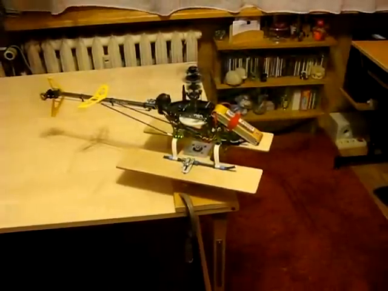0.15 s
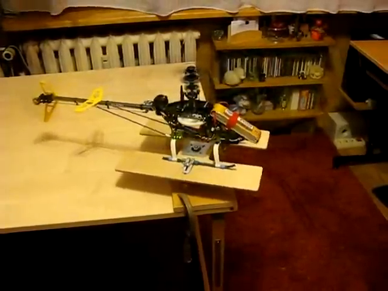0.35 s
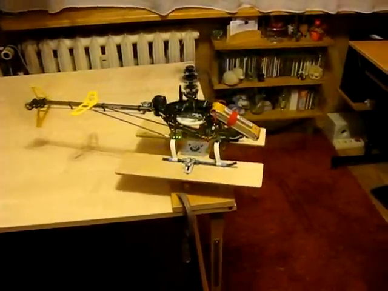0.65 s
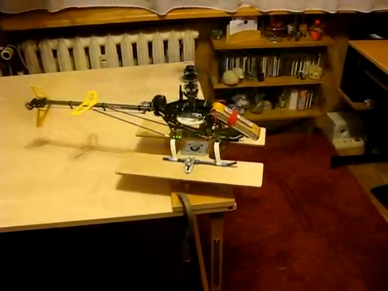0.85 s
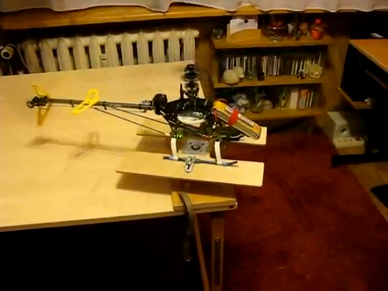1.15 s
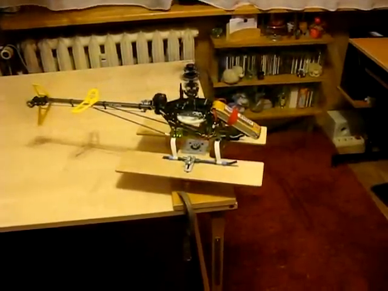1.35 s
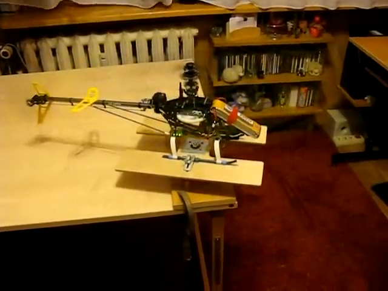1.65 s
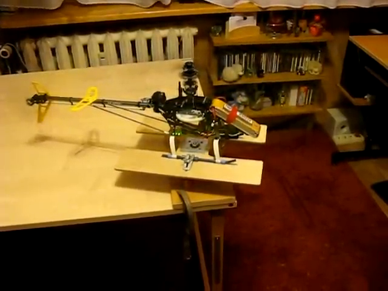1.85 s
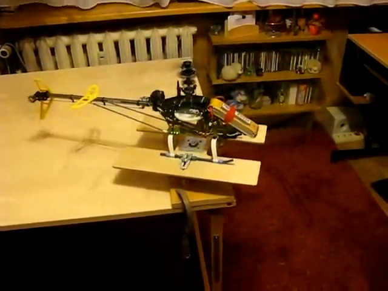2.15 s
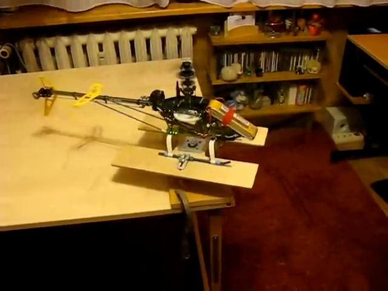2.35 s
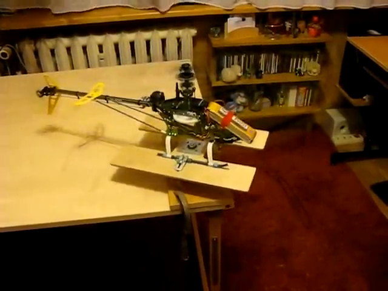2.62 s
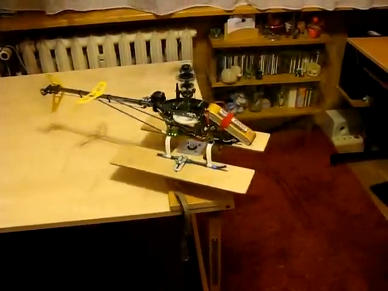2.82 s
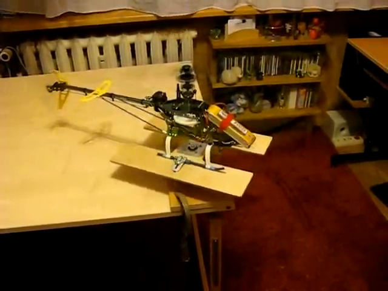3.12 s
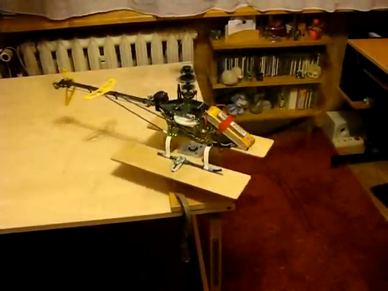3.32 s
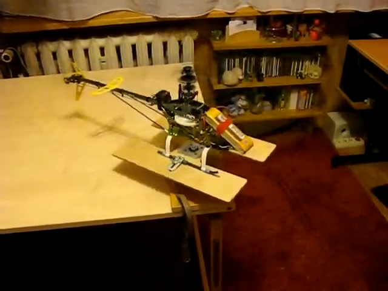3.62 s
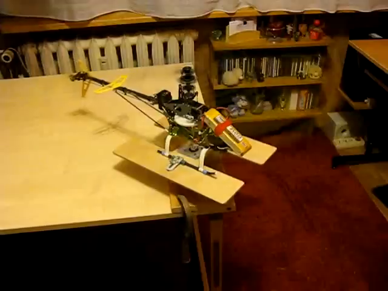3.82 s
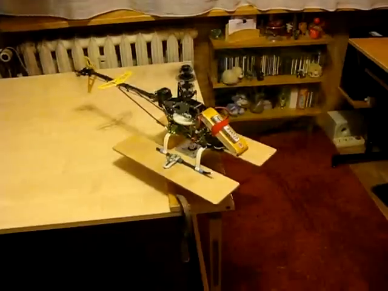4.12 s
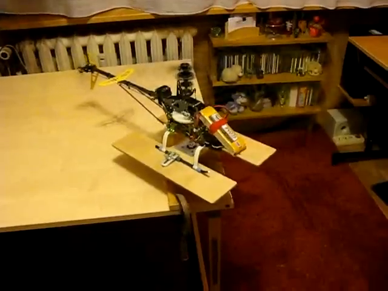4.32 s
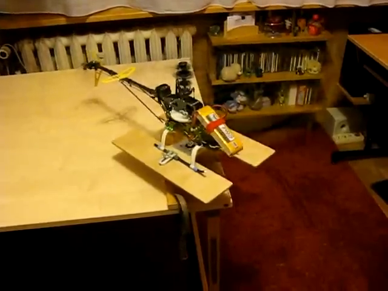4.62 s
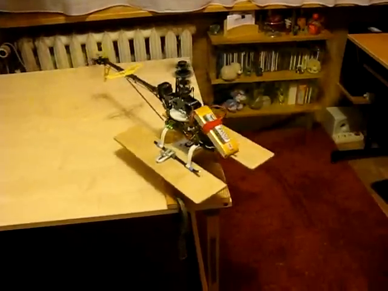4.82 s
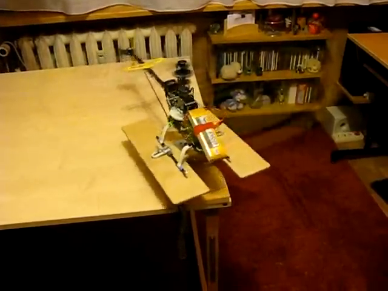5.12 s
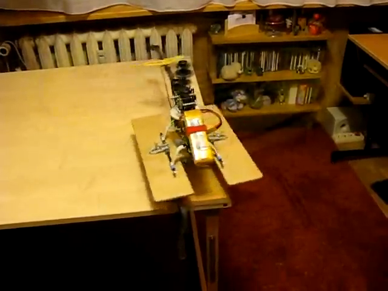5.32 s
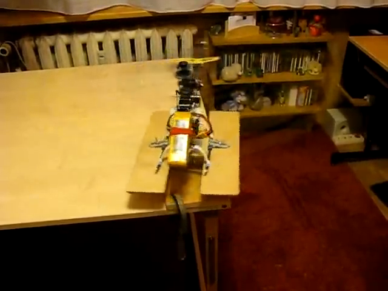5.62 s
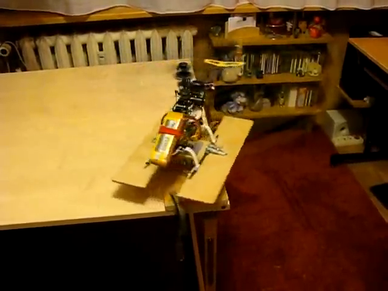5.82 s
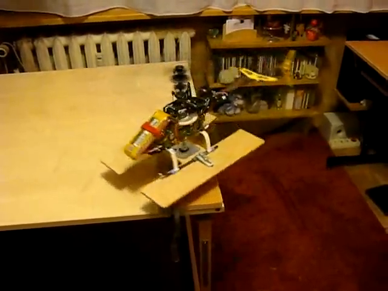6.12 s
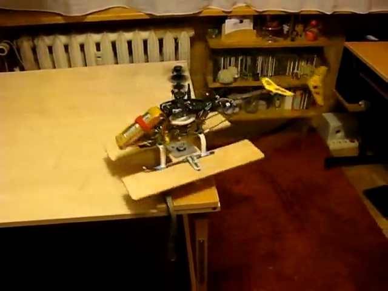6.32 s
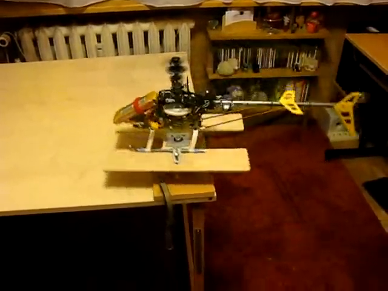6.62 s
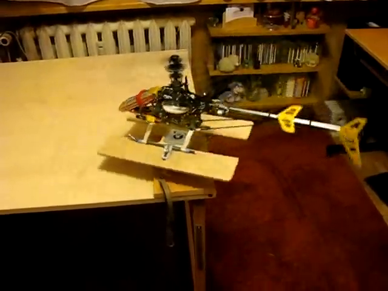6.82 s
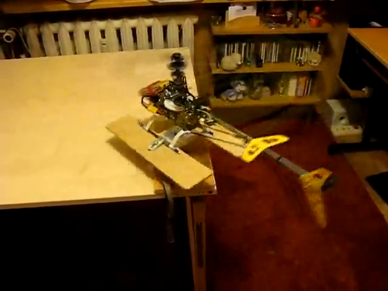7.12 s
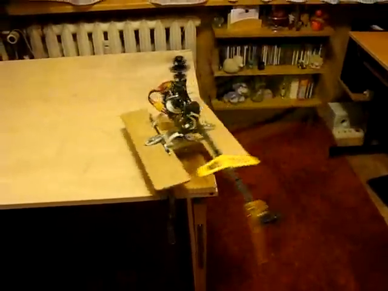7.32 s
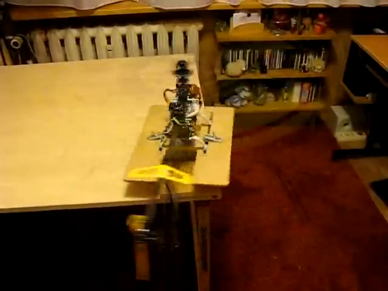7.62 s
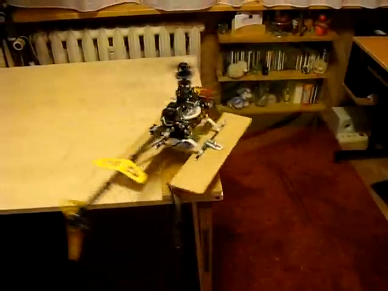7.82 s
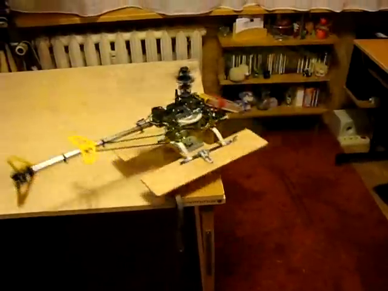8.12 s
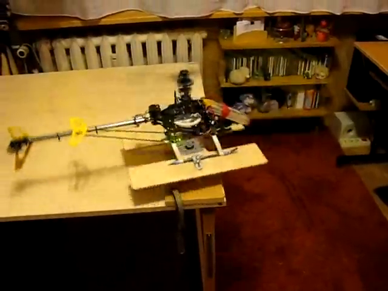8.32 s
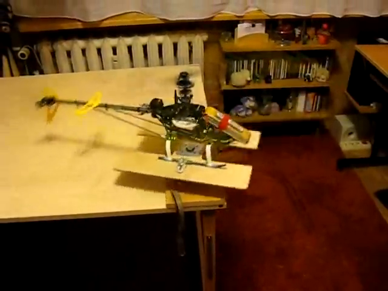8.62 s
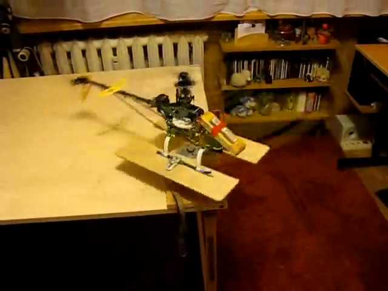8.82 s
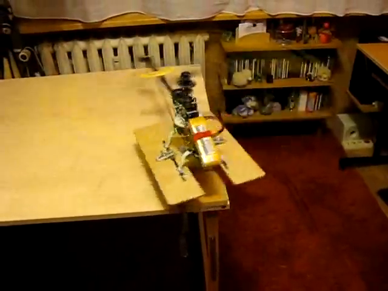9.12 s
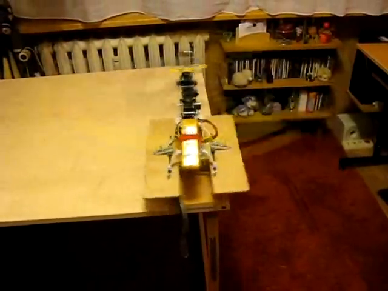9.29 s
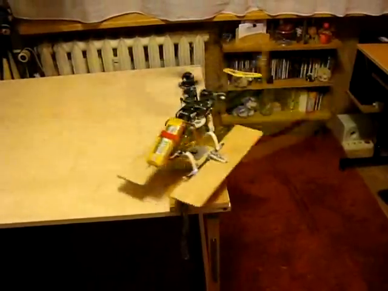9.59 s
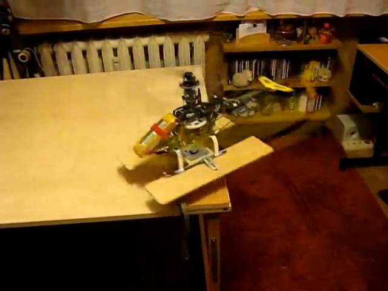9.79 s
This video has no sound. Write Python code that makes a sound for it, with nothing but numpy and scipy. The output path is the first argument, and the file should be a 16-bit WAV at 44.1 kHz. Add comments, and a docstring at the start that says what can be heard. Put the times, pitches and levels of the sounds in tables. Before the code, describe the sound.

In a furnished room, close to the microphone, a small electric model helicopter whines steadily with bright gear rasp, rising slightly for two seconds. The throttle closes: pitch slides down through a chirping, fluttering squeal and a thin electronic whistle. As the model swings round on its stand, small rattles shiver, then crisp metallic ticks cluster near the tail. It ends as a quiet, dry, slowing whirr over soft low bumps.

```python
"""Electric model helicopter running down

Without main blades, it runs on a swivelling stand in a furnished room. After two seconds the throttle closes.
Gear whine, whirrs and rasp follow one gear phase that slows down, with frame hum and a chirping squeal.
Rattles as the model swings round and tail-rotor ticks come at set times; a switching whistle is a sine.
Soft low bumps are filtered random pulses over filtered noise."""
import sys
import numpy as np
from scipy import signal
from scipy.fft import rfft, irfft, next_fast_len
from scipy.io import wavfile

SR = 44100
rng = np.random.default_rng(int(sys.argv[2]) if len(sys.argv) > 2 else 0)


def store_wav(level_fs):
    """Save 16-bit WAV to argv[1]."""
    pcm = np.round(np.clip(np.atleast_2d(level_fs), -1, 1) * 32767)
    wavfile.write(sys.argv[1], SR, pcm.T.astype(np.int16))


N = 438794
TIME = np.arange(N) / SR
SIZE = next_fast_len(N)
FREQS = np.maximum(np.fft.rfftfreq(SIZE, 1 / SR), 1)
GEAR_TEETH, PINION_TEETH, TAIL_RATIO = 150, 13, 4.24

# Level of the soft low bumps before wander. Each row: time in seconds, level in dB.
BUMP_LEVEL = [(0, -52), (2.7, -53.5), (4.45, -49.5), (6.4, -51.5), (9.95, -50)]
# Spectrum of the bumps. Each row: frequency in Hz, relative gain in dB.
BUMP_COLOUR = [(15, -11), (50, -1.5), (130, -1.5), (250, -4), (450, -8.5), (900, -17.5), (3000, -34)]
# Whistle of the speed controller. Each row: time in seconds, level in dB of the steady tone.
SWITCHING_LEVEL = [(0, -58), (.6, -44), (2.1, -38), (2.6, -52), (3.5, -38), (4.2, -35), (4.6, -50),
                   (4.9, -92)]
# Ticks at the tail. Each row: start in seconds, relative strength in dB.
TAIL_TICKS = [(7.7842, -38), (7.8092, -32), (7.8261, -37), (7.9329, -31), (8.0197, -35), (8.0531, -30),
              (8.0765, -29), (8.1429, -28), (8.1524, -33), (8.2107, -39), (8.2342, -24), (8.2571, -33),
              (8.2811, -30), (8.328, -39), (8.3514, -33), (8.3754, -33), (8.5455, -36)]
# Ringing modes of the ticking part. Each row: frequency in Hz, relative level in dB, t60 in seconds.
TICK_MODES = [(10850, -15, .012), (11000, -7, .016), (11000, -11, 0.0087), (11800, -9, .004),
              (10600, -12, .005), (13100, -27, .004)]
# Rattles of the swinging frame. Each row: start in seconds, relative strength in dB.
FRAME_RATTLES = [(5.99, -31.5), (6.075, -38), (6.165, -32.5), (6.239, -33), (6.405, -37), (6.5, -38),
                 (6.73, -39), (7.11, -37.5), (7.765, -45), (8.08, -37.5), (8.24, -43), (8.435, -40),
                 (8.865, -46), (8.895, -42), (9.23, -52), (9.39, -53)]
# Resonances of frame and stand. Each row: frequency in Hz, width in Hz, relative gain in dB.
FRAME_MODES = [(62.6, 18, -5), (123, 50, -12), (234, 64, -3), (528, 19, 5), (782, 27, 5), (885, 37, 0),
               (1069, 60, 2.5), (1320, 190, -1)]
# Tooth rate of the main gear. Each row: time in seconds, rate in Hz.
TOOTH_RATE = [(0, 4305), (.25, 4295), (.6, 4435), (1, 4585), (1.5, 4675), (1.85, 4716), (2.05, 4705),
              (2.3, 4605), (2.6, 4440), (3.3, 3990), (3.55, 3800), (4.7, 3280), (5, 3020), (6, 1960),
              (6.75, 1330), (7.1, 1080), (7.7, 860), (9, 640), (9.95, 530)]
# Rasp of teeth, belt and bearings. Each row: time in seconds, then relative level in dB for each rasp band.
RASP_LEVEL = [(0.0, -43.5, -42, -27.5, -24), (0.14, -47, -44, -30, -25), (0.3, -42, -39, -28.0, -26.5),
              (0.75, -45, -41, -33, -28), (2.05, -45.5, -41.5, -34, -28.0), (2.65, -50, -46, -32.5, -23),
              (2.9, -49.0, -45, -33, -24), (3.1, -44, -43.5, -29.5, -25.5), (3.7, -47, -41, -30, -29),
              (4.4, -48.5, -41.5, -30.5, -33.5), (5.1, -50, -42.5, -33.5, -35.5),
              (5.8, -52.5, -44.5, -40, -42.5), (6.3, -53, -45, -44, -45.5), (6.9, -53, -48, -47.5, -49.5),
              (7.65, -53.5, -52.5, -52.5, -52), (9.0, -54.5, -59.5, -54.5, -54.5),
              (9.95, -53.5, -61, -55.5, -55.5)]
# Bands of the rasp levels. Each row: lower edge in Hz, upper edge in Hz.
RASP_BANDS = [(600, 1800), (2200, 3300), (5300, 8400), (9900, 13000)]
# Rasp spectrum with teeth pressed together. Each row: frequency in Hz, relative gain in dB.
TIGHT_COLOUR = [(100, -21), (400, -7), (800, -1.5), (1700, -2), (2700, -1), (3700, 2), (5300, 2.5),
                (7200, -1.5), (9000, 0), (10800, 0.5), (12000, -1), (13000, -3.5), (13800, -7)]
# Rasp spectrum with teeth running loose. Each row: frequency in Hz, relative gain in dB.
LOOSE_COLOUR = [(100, 1.5), (500, 1.5), (800, 1.5), (1030, 1), (1500, -1), (3000, 1), (3620, 3),
                (3870, 5.5), (4150, 1.5), (5300, 3), (6200, 1), (7000, 3), (7900, -4.5), (9100, 1),
                (10000, -2), (10700, 1.5), (12200, -2.5), (13800, -8.5)]
# Once-a-turn throb of the rasp. Each row: time in seconds, depth from 0 to 1 at the top of the treble.
RASP_THROB = [(0, 0.15), (.6, .1), (1.4, 0.28), (2.1, 0.25), (3.4, 0.02)]
# Whine away from resonances. Each row: time in seconds, then relative level in dB of the tooth rate,
# of its 2nd multiple and of its 3rd.
WHINE_LEVEL = [(0, -32.5, -41, -47), (.55, -27, -27, -30), (1, -24, -28, -35), (1.5, -25, -27, -27),
               (2, -24, -28.5, -40), (2.8, -32, -39, -46), (3.3, -39.5, -48, -46), (3.9, -37.5, -41, -33.5),
               (5, -50, -42, -45), (5.7, -64, -51.5, -63), (6.15, -59, -51, -49), (7, -72, -69, -58),
               (9.95, -80, -91, -73)]
# Resonances that lift a passing multiple of the tooth rate.
# Each row: frequency in Hz, half width (Gaussian sigma) in Hz, lift in dB.
WHINE_FLARES = [(1073, 25, 15), (1320, 35, 16), (1930, 55, 6.5), (3780, 87, 2), (5120, 160, 10),
                (5680, 150, 7)]
# Higher whirrs of the drive. Each row: multiple of the tooth rate, centre in seconds,
# half length (Gaussian sigma) in seconds, relative level in dB, width in Hz.
DRIVE_WHIRRS = [(1.073, 1.3, 0.96, -37.5, 45), (1.4, 4.1, .5, -56, 45), (2.48, 3.17, 0.59, -34, 380),
                (2.556, .1, .15, -35, 200), (2.917, 2.1, 0.7, -37, 260), (1.931, 1.6, 0.69, -38.5, 150),
                (3.013, 4.3, 0.41, -38.5, 262), (3.973, 4.47, 0.25, -37, 300)]


def from_db(db):
    """Decibels to gain."""
    return 10 ** (np.asarray(db) / 20)


def rms_one(x):
    """Scale to unit rms."""
    return x / np.sqrt(np.mean(np.abs(x) ** 2) + 1e-20)


def in_time(rows):
    """Interpolate each column of a time table at every sample."""
    s, *columns = np.transpose(rows)
    return [np.interp(TIME, s, column) for column in columns]


def colour(points):
    """Gain at every frequency from (Hz, dB) points, interpolated on log frequency."""
    hz, db = np.transpose(points)
    return from_db(np.interp(np.log(FREQS), np.log(hz), db))


def shaped(x, gain):
    """Filter by a gain per frequency."""
    return irfft(rfft(x, SIZE) * gain, SIZE)[:N]


def drift(bandwidth_hz):
    """Low-passed noise of rms 1."""
    return rms_one(shaped(rng.standard_normal(N), 1 / (1 + (FREQS / bandwidth_hz) ** 4)))


def swell(centre_s, sigma_s):
    """Gaussian rise and fall of height 1."""
    return np.exp(-((TIME - centre_s) / sigma_s) ** 2 / 2)


def ring(clicks, hz, t60_s):
    """Two-pole resonator: a unit click starts a decaying sine of about height 1."""
    radius = from_db(-60 / (t60_s * SR))
    w = 2 * np.pi * hz / SR
    return signal.lfilter([0, np.sin(w)], [1, -2 * radius * np.cos(w), radius ** 2], clicks + 1e-18)


def blurred(phase, width_hz):
    """Tone of about rms 1, smeared into a narrow band by random quadrature amplitudes."""
    return drift(width_hz) * np.cos(phase) + drift(width_hz) * np.sin(phase)


def room(x, wet_db, t60_s=0.41):
    """Add a short diffuse tail from walls and shelves: decaying noise after 4 ms."""
    age_s = TIME[:SR // 2]
    tail = rng.standard_normal(len(age_s)) * from_db(-60 * age_s / t60_s) * (age_s > .004)
    return x + from_db(wet_db) * signal.fftconvolve(x, tail / np.linalg.norm(tail))[:N]


def bumps(pulses_per_s=60, size_spread_db=1.0, patter_db=-1, rumble_db=-7, wander_db=1.8, wander_hz=8.9):
    """Dull one-sided pulses at random times over a soft rumble; a wandering level clusters them."""
    pulses = (rng.random(N) < pulses_per_s / SR) * from_db(size_spread_db * rng.standard_normal(N))
    gain = colour(BUMP_COLOUR)
    patter = rms_one(shaped(pulses.mean() - pulses, gain))
    rumble = rms_one(shaped(rng.standard_normal(N), gain))
    level_db = in_time(BUMP_LEVEL)[0] + wander_db * drift(wander_hz)
    return from_db(level_db) * (from_db(patter_db) * patter + from_db(rumble_db) * rumble)


def controller(switching_hz=12092, waver=.45, waver_width_hz=70):
    """The motor windings sing at the switching rate while the throttle is partly open."""
    phase = 2 * np.pi * switching_hz * TIME
    tone = np.sqrt(2) * np.sin(phase) + waver * blurred(phase, waver_width_hz)
    return from_db(in_time(SWITCHING_LEVEL)[0]) * tone


def tail_ticks(grazes_per_s=900, chafe_db=-50.5, chafe_centre_s=8.15, chafe_sigma_s=0.26):
    """The turning tail rotor flicks and chafes a small metal part, ringing its modes."""
    s, db = np.transpose(TAIL_TICKS)
    grazes = rng.standard_normal(N) * (rng.random(N) < grazes_per_s / SR)
    ticks, chafe = 0, 0
    for hz, mode_db, t60_s in TICK_MODES:
        clicks = np.zeros(N)
        clicks[(s * SR).astype(int)] = from_db(db + mode_db + rng.standard_normal(len(s)))
        ticks = ticks + ring(clicks, hz, t60_s)
        chafe = chafe + from_db(mode_db) * ring(grazes, hz, t60_s)
    return ticks + from_db(chafe_db) * swell(chafe_centre_s, chafe_sigma_s) * rms_one(chafe)


def rattles(rise_s=0.0014, decay_s=0.044, trim_db=-2, low_hz=4200, grain_db=3.0, grain_hz=400):
    """Loose parts shiver as the frame swings: grainy bright noise, quick rise, exponential fade."""
    envelope = 0
    for start_s, db in FRAME_RATTLES:
        age_s = np.clip(TIME - start_s, 0, 1)
        shape = (1 - np.exp(-age_s / rise_s)) * np.exp(-age_s / decay_s)
        envelope = envelope + from_db(db + trim_db) * shape
    contacts = rng.standard_normal(N) * from_db(grain_db * drift(grain_hz))
    bright = colour(LOOSE_COLOUR) / (1 + (low_hz / FREQS) ** 2)
    return envelope * rms_one(shaped(contacts, bright))


def squeal(turn, multiple=2.8, centre_s=2.83, sigma_s=0.34, level_db=-31, sweep_hz=650, width_hz=170):
    """As the throttle closes the drive rubs once a turn, each rub a high rising chirp."""
    rub = rms_one((1 + np.cos(turn)) ** 2)
    sweep = 2 * np.pi * np.cumsum(sweep_hz * np.sin(turn)) / SR
    tone = blurred(multiple * GEAR_TEETH * turn + sweep, width_hz)
    return from_db(level_db) * swell(centre_s, sigma_s) * rub * tone


def frame_hum(turn, peak_db=-48, load_share=1.32, waver=1.0, harmonics=23, knot_s=.08):
    """The two-armed rotor head shakes the resonant frame; each harmonic wavers on its own."""
    knots_s = np.arange(0, TIME[-1] + 1, knot_s)
    shake = 0
    for k, phase in enumerate(rng.uniform(0, 2 * np.pi, size=harmonics), 1):
        strength = 1 + waver * np.interp(TIME, knots_s, rng.standard_normal(len(knots_s)))
        shake = shake + strength * np.cos(2 * k * turn + phase)
    response = sum(from_db(db) / (1 + 2j * (FREQS - hz) / width_hz) for hz, width_hz, db in FRAME_MODES)
    load_db = in_time(WHINE_LEVEL)[0]
    level_db = peak_db + load_share * (load_db - load_db.max())
    return from_db(level_db) * rms_one(shaped(shake, response))


def rasp_source(mesh_hz, tight, loose_db=-0.78, grain_db=1.0, grain_hz=1060, knock_db=-6):
    """Countless tiny contacts excite the frame; loose teeth also knock one by one."""
    contacts = rms_one(rng.standard_normal(N) * from_db(grain_db * drift(grain_hz)))
    knocks = rms_one(rng.standard_normal(N) * (rng.random(N) < mesh_hz / SR))
    loose = rms_one(contacts + from_db(knock_db) * knocks)
    source = tight * shaped(contacts, colour(TIGHT_COLOUR))
    return source + (1 - tight) * shaped(loose, from_db(loose_db) * colour(LOOSE_COLOUR))


def rasp_throb(turn, tight, flutter=0.12, flutter_hz=37, tail_throb=0.2):
    """Relative level swing: once a turn of the gear, random flutter, and the tail rotor when loose."""
    gear = np.cos(turn + 0.78 * drift(0.91)) + 0.38 * np.cos(2 * turn) + 0.15 * np.cos(3 * turn)
    tail_turn = TAIL_RATIO * turn
    tail = 0.89 * np.cos(tail_turn) + np.cos(2 * tail_turn)
    return in_time(RASP_THROB)[0] * gear + flutter * drift(flutter_hz) + tail_throb * (1 - tight) ** 2 * tail


def rasp(turn, mesh_hz, loose_hz=2000, tight_hz=3900, fits_db=1.0, fits_hz=12, steps=10, full_throb_hz=10500):
    """Contact noise in overlapping bands; resonances stand out as the drive slows and runs loose."""
    tight = np.clip((mesh_hz - loose_hz) / (tight_hz - loose_hz), 0, 1)
    source = rasp_source(mesh_hz, tight)
    throb = rasp_throb(turn, tight)
    fits = fits_db * (1 - tight) ** 2 * drift(fits_hz)   # a loose drive rasps in fits
    bands = np.array(RASP_BANDS)
    density_db = np.array(in_time(RASP_LEVEL)) - 10 * np.log10(np.diff(bands) / (SR / 2))
    centres = np.log(bands).mean(axis=1)
    log_steps = np.linspace(centres[0], centres[-1], steps)
    out = 0
    for step, own in zip(log_steps, np.eye(steps)):
        weights = np.array([np.interp(step, centres, row) for row in np.eye(len(centres))])
        share = min(np.exp(step) / full_throb_hz, 1)   # the treble throbs most
        band = shaped(source, np.interp(np.log(FREQS), log_steps, own))
        out = out + from_db(weights @ density_db + share * fits) * (1 + share * throb) * band
    return out


def tooth_pressure(turn, throb=0.49, unrest=0.3, unrest_hz=135):
    """Once-a-turn level swing of rms 1, with broad swells and narrow dips."""
    runout = throb * np.exp(1j * (turn + 2 * np.pi / 3))
    return rms_one(np.abs(1 + runout + unrest * drift(unrest_hz)))


def whirrs(tooth):
    """Higher parts of the drive whirr: narrow bands at fixed multiples of the tooth rate."""
    out = 0
    for multiple, centre_s, sigma_s, db, width_hz in DRIVE_WHIRRS:
        out = out + from_db(db) * swell(centre_s, sigma_s) * blurred(multiple * tooth, width_hz)
    return out


def whine(turn, mesh_hz, swing_rad=0.96, jitter_rad=0.28, jitter_hz=46, pinion_swing_rad=1 / 7,
          skirt_hz=190, skirt_db=-12, skirt_rise_db=7, slack_skirt_db=7, fits_db=3, fits_hz=18, echo_db=-12):
    """The gear runs slightly out of true, so its tooth tone swings in pitch and level once a turn."""
    tooth = GEAR_TEETH * turn
    uneven = swing_rad * np.sin(turn + 0.31 * drift(3.6)) + jitter_rad * drift(jitter_hz)
    uneven += pinion_swing_rad * np.sin(tooth / PINION_TEETH)
    pressure = tooth_pressure(turn)
    out = 0
    for k, drive_db in enumerate(in_time(WHINE_LEVEL), 1):
        db = drive_db
        for hz, sigma_hz, lift_db in WHINE_FLARES:
            db = db + lift_db * np.exp(-((k * mesh_hz - hz) / sigma_hz) ** 2 / 2)
        slack = np.clip((-25.5 - db) / 15, 0, 1)   # lightly loaded teeth sing roughly and in fits
        skirt = from_db(skirt_db + skirt_rise_db * (k - 1) + slack_skirt_db * slack)
        tone = np.sqrt(2) * np.sin(k * (tooth + uneven)) + skirt * blurred(k * tooth, skirt_hz)
        level = from_db(db + fits_db * slack * drift(fits_hz))
        out = out + level * tone / np.hypot(1, skirt) * pressure
    return room(out + whirrs(tooth), wet_db=echo_db)


def scene():
    """One gear phase drives whine, rasp, hum and squeal; both channels are alike."""
    mesh_hz, = in_time(TOOTH_RATE)
    turn = 2 * np.pi * np.cumsum(mesh_hz / GEAR_TEETH) / SR
    background = bumps() + controller()
    clatter = room(tail_ticks() + rattles() + squeal(turn) + rasp(turn, mesh_hz), wet_db=-12.5)
    return np.tile(background + clatter + frame_hum(turn) + whine(turn, mesh_hz), (2, 1))


def record(dry, cutoff_hz=13800):
    """Cut the top steeply with an elliptic low-pass."""
    return signal.sosfilt(signal.ellip(12, .1, 90, cutoff_hz, fs=SR, output="sos"), dry)


dry = scene()
out = record(dry)
store_wav(out)
```